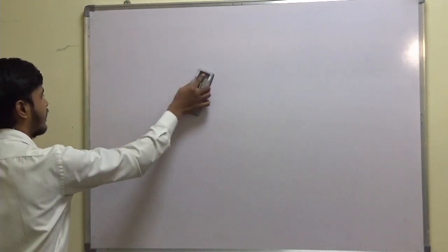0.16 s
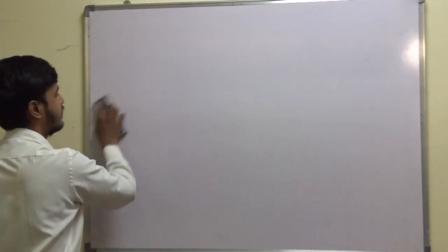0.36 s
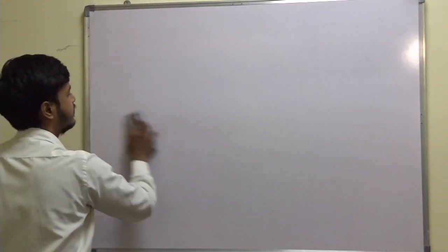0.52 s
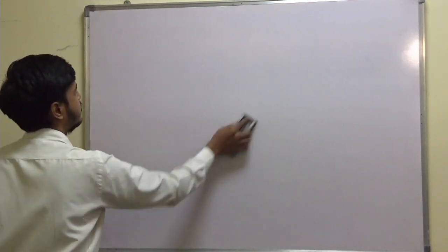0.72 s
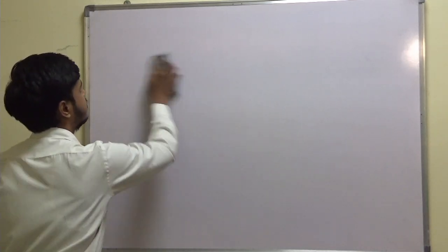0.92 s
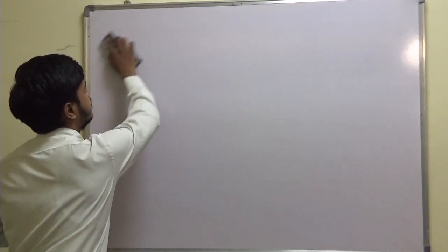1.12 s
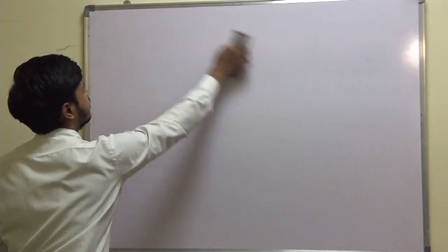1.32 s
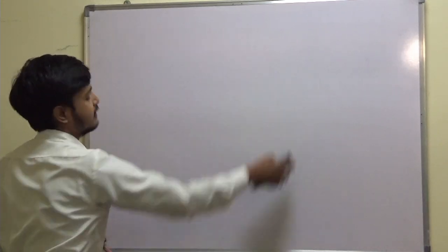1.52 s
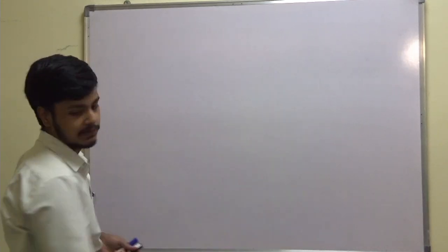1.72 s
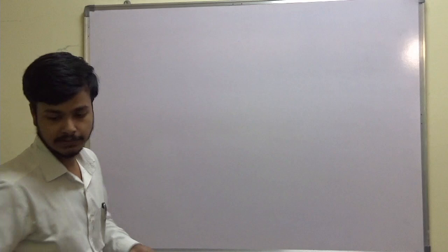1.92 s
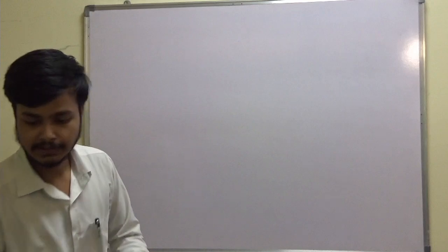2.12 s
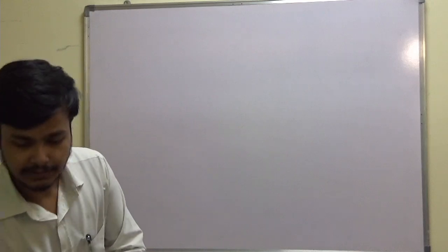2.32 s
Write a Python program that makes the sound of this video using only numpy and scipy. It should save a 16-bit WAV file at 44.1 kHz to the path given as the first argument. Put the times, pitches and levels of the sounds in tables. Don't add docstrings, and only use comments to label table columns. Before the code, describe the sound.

Whiteboard eraser swishing to and fro with small bumps, then a hard overloaded knock on the desk

```python
import sys
import numpy as np
from scipy import signal
from scipy.fft import rfft, irfft, next_fast_len
from scipy.io import wavfile

SR = 44100
rng = np.random.default_rng(int(sys.argv[2]) if len(sys.argv) > 2 else 0)


def convert_level_to_amplitude(level_db):
    exponent = np.asarray(level_db, float) / 20
    return 10 ** exponent


def digitize_waveform(pressure):
    field = np.atleast_2d(pressure).T
    bounded = np.clip(field, -1, 1)
    quanta = np.round(bounded * 32767).astype(np.int16)
    wavfile.write(sys.argv[1], SR, quanta)


N = 103767


def rms_one(x):
    return x / np.sqrt(np.mean(x ** 2) + 1e-20)


def drift(rate_hz):
    r = np.exp(-2 * np.pi * rate_hz * 40 / SR)
    slow = signal.lfilter([1], [1, -2 * r, r * r], rng.standard_normal(N // 40 + 2002))
    slow = rms_one(slow[2000:])
    return np.interp(np.arange(N) / 40, np.arange(len(slow)), slow)


def resonance(x, hz, width_hz):
    r = np.exp(-np.pi * width_hz / SR)
    poles = [1, -2 * r * np.cos(2 * np.pi * hz / SR), r * r]
    return signal.lfilter(np.array([1, 0, -1]) * (1 - r * r) / 2, poles, x)


def ring(clicks, hz, t60):
    r = convert_level_to_amplitude(-60 / (t60 * SR))
    w = 2 * np.pi * hz / SR
    return signal.lfilter([0, np.sin(w)], [1, -2 * r * np.cos(w), r * r], clicks + 1e-18)


def soften(x, hz):
    r = np.exp(-2 * np.pi * hz / SR)
    return signal.lfilter([(1 - r) ** 2], [1, -2 * r, r * r], x)


def colour(source, spectrum, patchy_db):
    hz, db = np.transpose(spectrum)
    size = next_fast_len(N)
    bins = np.maximum(np.arange(size // 2 + 1) * SR / size, 1)
    shape = convert_level_to_amplitude(np.interp(np.log(bins), np.log(hz), db))
    shape = shape * np.minimum(bins / hz[0], 1) ** 2
    shaped = irfft(rfft(source, size) * shape, size)[:N]
    return rms_one(shaped * convert_level_to_amplitude(patchy_db * drift(12)))


def grains(per_s, spread_db):
    sizes = convert_level_to_amplitude(spread_db * np.minimum(rng.exponential(1, N), 5)) * rng.choice([-1, 1], N)
    return rms_one(sizes * (rng.random(N) < per_s / SR))


def arcs(rows, shape, peak_share=0.59):
    t, out = np.arange(N) / SR, np.zeros(N)
    for s, length, db in rows:
        phase = np.interp((t - s) / length, [0, peak_share, 1], [0, .5, 1])
        out += convert_level_to_amplitude(db) * np.abs(np.sin(np.pi * phase)) ** shape
    return out


def click(s, db):
    out = np.zeros(N)
    out[int(s * SR)] = convert_level_to_amplitude(db)
    return out


def dying(s, db, t60, rise_s):
    age = np.maximum(np.arange(N) / SR - s, 0)
    return convert_level_to_amplitude(db - 60 * age / t60) * (1 - np.exp(-age / rise_s))


def eraser():
    # start t/s, length t/s, level/dB
    strokes = [(-.1, 0.26, -49.5), (.2, 0.23, -47), (.48, 0.26, -47), (.78, 0.3, -48.5), (1.11, 0.31, -47)]
    # f/Hz, level/dB per Hz
    felt = [(300, -37), (1500, -11), (2600, -4.5), (3400, 0), (5000, -1), (7800, -4.5), (9500, -6.5),
            (15500, -12)]
    # f/Hz, width f/Hz, gain/dB
    pad = [(3660, 540, -5), (4400, 600, -9.5), (7300, 1800, -8)]
    # f/Hz, width f/Hz, level/dB
    board_hum = [(373, 74, -58), (315, 19, -57), (500, 67, -66.5), (300, 80, -61.5)]
    lift_off_s, resting_db = 1.5, -55

    pressed = 1 / (1 + np.exp((np.arange(N) / SR - lift_off_s) / .02))
    speed = np.hypot(arcs(strokes, shape=0.62), convert_level_to_amplitude(resting_db) * pressed)
    slips = grains(per_s=9000, spread_db=0.5)
    tilting = sum(convert_level_to_amplitude(db + 3 * drift(3)) * resonance(slips, hz, w) for hz, w, db in pad)
    slips = colour(slips + tilting, felt, patchy_db=.5)
    dull = signal.lfilter(*signal.butter(1, 7000, fs=SR), slips)
    brightness = (speed / speed.max()) ** 0.2
    hiss = speed * (dull + (slips - dull) * brightness)
    hum = sum(convert_level_to_amplitude(db + 0.51 * drift(9)) * rms_one(resonance(rng.standard_normal(N), hz, w))
              for hz, w, db in board_hum)
    return hiss + pressed * hum


def sleeve():
    # start t/s, length t/s, level/dB
    swishes = [(1.42, 0.16, -46.5), (1.6, 0.082, -55.5), (1.72, 0.15, -56), (1.885, 0.037, -55),
               (1.9, 0.23, -47.5)]
    # f/Hz, level/dB per Hz
    cloth = [(400, -20), (1000, 0.5), (2000, -4), (3000, 2), (4500, -4), (8000, -7.5), (11000, -18.5),
             (15500, -29)]
    rustle = colour(grains(per_s=9000, spread_db=2.2), cloth, patchy_db=.7)
    return arcs(swishes, shape=1.23, peak_share=0.29) * rustle


def bumps():
    # t/s, level/dB, contact hardness f/Hz
    hits = [(.530, -37, 3500), (.546, -34.5, 1230), (.579, -33.5, 600), (.604, -33, 900), (1.038, -45, 900),
            (.18, -37.5, 700)]
    # f/Hz, level/dB, t60 t/s
    board = [(342, -4, .16), (394, -5, .15), (491, -5, .09), (700, -6.5, 0.11), (785, -8, .1),
             (940, -6, 0.091), (1130, -14, .04), (1850, -1, 0.039), (2440, -14, .015), (3600, -15, .01)]
    # t/s, level/dB, t60
    # t/s
    scuffs = [(0.527, -40, 0.25), (.577, -51.5, .15), (.601, -52, 0.089)]
    # f/Hz, level/dB per Hz
    scuff_tone = [(200, -18), (400, 2), (900, -4), (1800, -6), (2500, -8.5), (4000, -15), (8000, -25.5)]

    chance_db = rng.normal(0, 1.5, (len(hits), len(board)))
    drag = sum(dying(*row, rise_s=0.0016) for row in scuffs)
    out = drag * colour(grains(per_s=5600, spread_db=-1.5), scuff_tone, patchy_db=-2.5)
    for i, (s, db, hard_hz) in enumerate(hits):
        for k, (hz, mode_db, t60) in enumerate(board):
            strength_db = db - 2 + mode_db + chance_db[i, k]
            out += ring(soften(click(s, strength_db), hard_hz), hz, t60)
    return out


def desk():
    # f/Hz, level/dB, t60 t/s, sign at the microphone
    desk_low = [(154.6, -1.4, .22, -1), (192.6, -5.2, .6, 1), (201.3, -2, .3, 1), (218.7, -9.5, .14, -1),
                (109.7, -25, .8, -1)]
    # f/Hz, level/dB, t60 t/s
    leg_modes = [(66, -19.5, .3), (27, -28, 0.38)]
    # f/Hz, level/dB, t60 t/s
    rap_modes = [(860, -6, 0.061), (1250, 0.5, 0.021), (1730, -4, 0.016), (2920, -17, .015)]
    # f/Hz, level/dB per Hz
    crack_tone = [(1500, -6), (3000, 0), (6000, -4), (8500, -15), (12000, -26), (15500, -33.5)]
    # f/Hz, level/dB per Hz
    rattle_tone = [(260, -19), (400, -1.5), (650, -7.5), (1200, 2.8), (2000, -11.5), (3600, -16),
                   (7000, -32), (15500, -51)]
    # start t/s, length t/s, level/dB
    leaning = [(1.885, 0.053, -36)]
    drop_s, rap_db, rattle_db = 2.2865, -9.5, -21
    thud_s, thud_db = 2.28874, 1.0

    thud = sum(sign * ring(click(thud_s, thud_db + db), hz, t60) for hz, db, t60, sign in desk_low)
    legs = sum(ring(soften(click(thud_s, db), 220), hz, t60) for hz, db, t60 in leg_modes)
    rap = sum((-1) ** k * ring(click(drop_s, rap_db + db), hz, t60)
              for k, (hz, db, t60) in enumerate(rap_modes))

    rattle = colour(grains(per_s=7000, spread_db=2.5), rattle_tone, patchy_db=.4)
    body = signal.lfilter(*signal.butter(2, 1800, fs=SR), rattle)
    top = (rattle - body) * dying(drop_s, rattle_db + 0.5, t60=.4, rise_s=0.0042)
    body = body * dying(drop_s, rattle_db, t60=1.3, rise_s=0.0042)

    crack = colour(rng.standard_normal(N), crack_tone, patchy_db=1)
    crack = crack * dying(drop_s, db=-25, t60=0.017, rise_s=0.00028)
    lean = arcs(leaning, shape=.9, peak_share=0.76) * np.sin(2 * np.pi * 189.5 * np.arange(N) / SR)
    return thud + legs + rap + crack + body + top + lean


def ventilation():
    # f/Hz, width f/Hz, level/dB
    fan = [(68.7, 12, -62), (122, 6.7, -59.5), (136, 15, -59), (211, 16, -56), (250, 25, -58),
           (763, 25, -63.5), (1115, 150, -58), (30, 21, -63)]
    # f/Hz, rms level/dB
    motor = [(202, -58), (396, -56)]
    # f/Hz, level/dB per Hz
    air_tone = [(20, -3), (92, -34), (190, -5.5), (404, -1.5), (1200, -10.5), (2090, -16.5), (7110, -26),
                (15500, -36.5)]
    humps = sum(convert_level_to_amplitude(db) * rms_one(resonance(rng.standard_normal(N), hz, w)) for hz, w, db in fan)
    tones = np.zeros(N)
    for hz, db in motor:
        level = convert_level_to_amplitude(db + 3 + 3.5 * drift(10))
        tones += level * np.sin(2 * np.pi * np.cumsum(hz + 6 * drift(8)) / SR)
    air = convert_level_to_amplitude(-48) * colour(rng.standard_normal(N), air_tone, patchy_db=.4)
    return air + humps + tones


def room(x):
    t60, tail_db, gap_s = .35, -10, .006
    t = np.arange(SR // 2) / SR
    tail = rng.standard_normal(len(t)) * convert_level_to_amplitude(-60 * t / t60) * (t > gap_s)
    tail = tail / np.sqrt(np.sum(tail ** 2))
    return x + convert_level_to_amplitude(tail_db) * signal.fftconvolve(x, tail)[:N]


def scene():
    return (room(eraser() + sleeve() + bumps()) + desk() + ventilation())[None, :]


def band_limit(x):
    return signal.sosfilt(signal.butter(12, 15740, fs=SR, output="sos"), x)


def record(dry):
    overload = .96
    clipped = np.clip(dry, -overload, overload)
    low_pass = signal.ellip(10, .3, 60, 15750, fs=SR, output="sos")
    return band_limit(signal.sosfilt(low_pass, clipped))


dry = scene()
out = record(dry)
digitize_waveform(out)
```